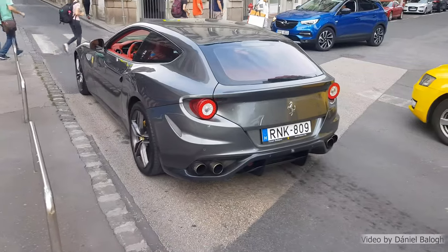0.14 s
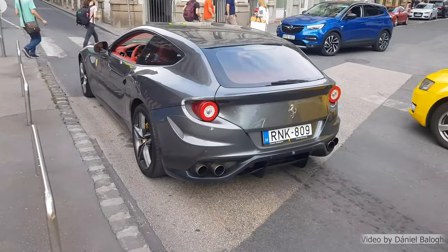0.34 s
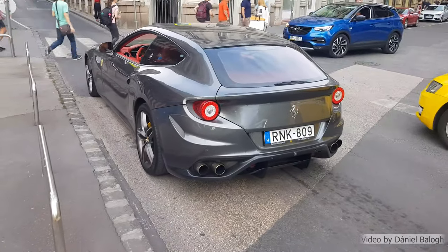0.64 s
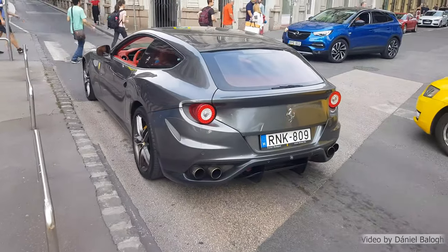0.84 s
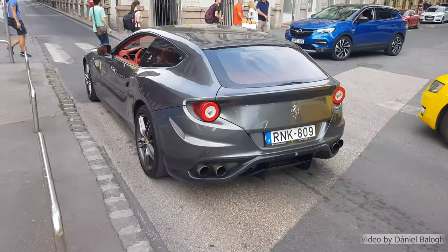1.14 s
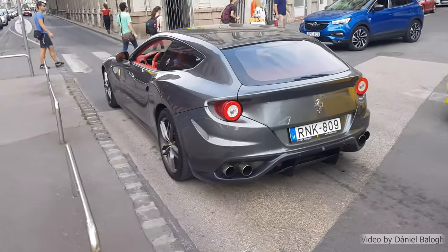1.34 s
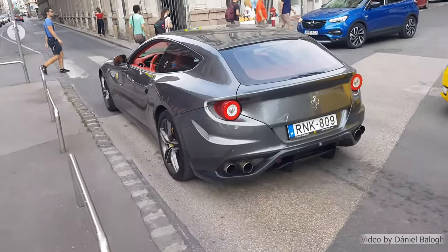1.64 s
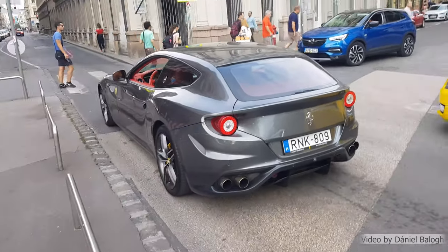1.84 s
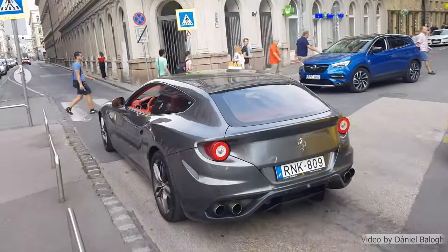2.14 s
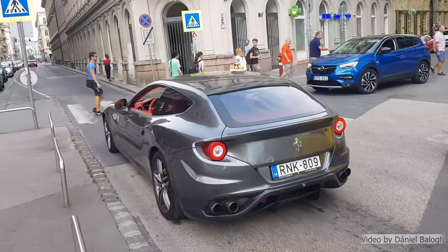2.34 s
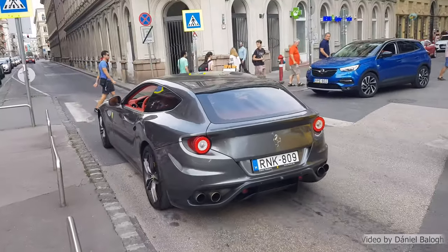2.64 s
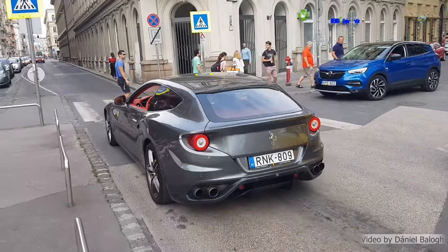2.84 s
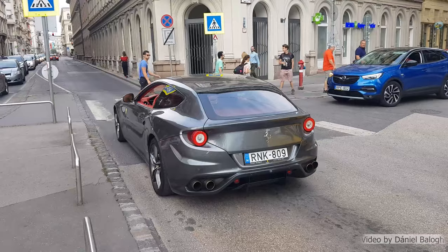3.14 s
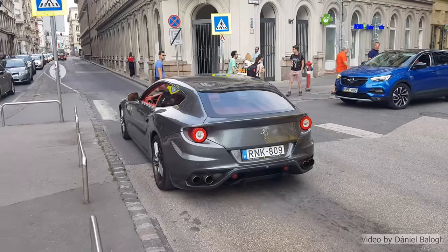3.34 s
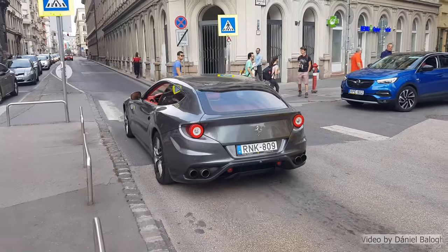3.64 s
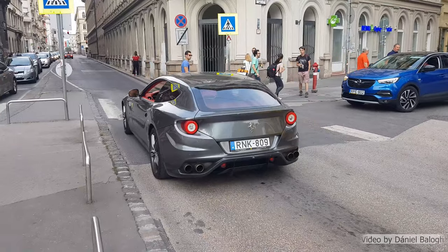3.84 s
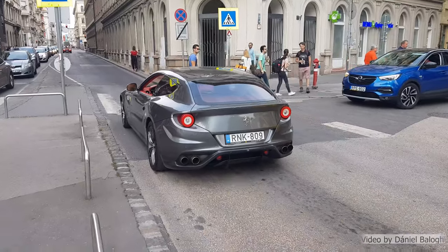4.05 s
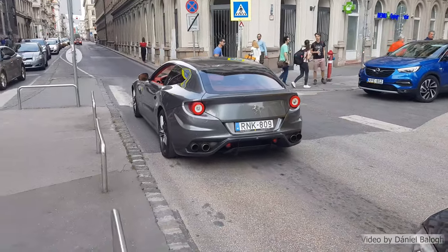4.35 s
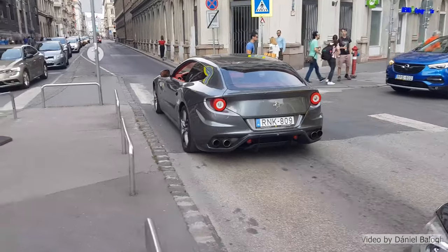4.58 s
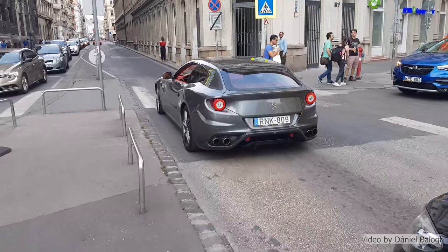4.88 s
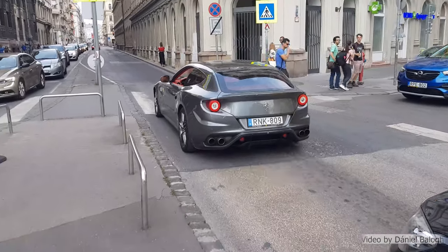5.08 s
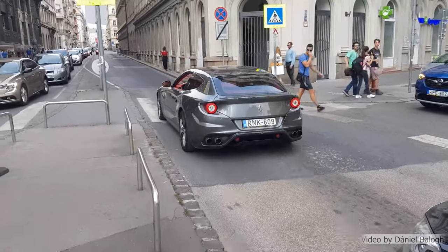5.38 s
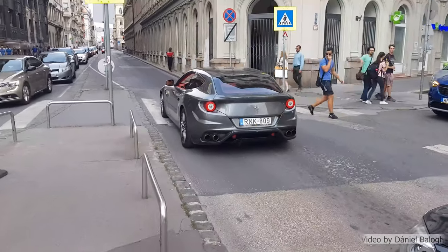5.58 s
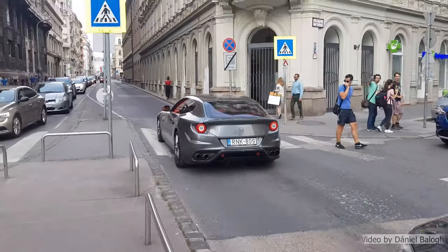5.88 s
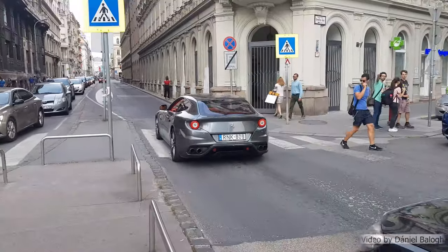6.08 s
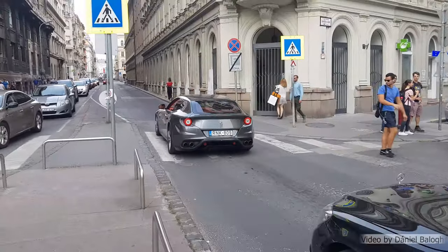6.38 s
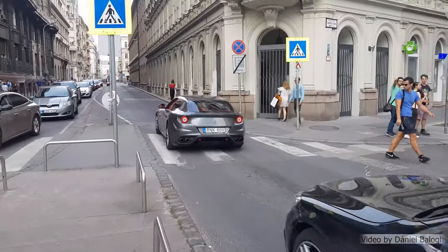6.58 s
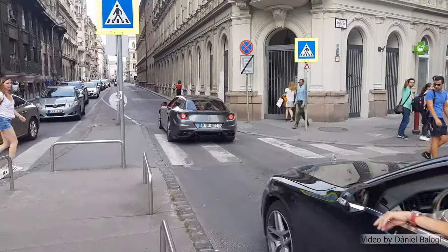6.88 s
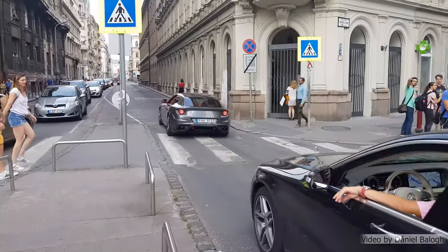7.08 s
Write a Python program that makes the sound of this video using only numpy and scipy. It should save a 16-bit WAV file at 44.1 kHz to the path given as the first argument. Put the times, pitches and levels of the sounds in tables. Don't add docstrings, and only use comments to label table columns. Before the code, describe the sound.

A handheld microphone stands behind a powerful car on a stone-fronted street. Its deep, muffled exhaust hums at idle, booms up, drops with a brief rasping crackle, then rises again as it leaves at modest revs, ending in a fainter, higher howl. Airy fan noise from another idling car swells at left early on, over steady distant traffic, with occasional handling knocks and dry clicks.

```python
import sys
import numpy as np
from scipy import signal
from scipy.fft import rfft, irfft
from scipy.io import wavfile
from scipy.ndimage import uniform_filter1d

SR = 44100
rng = np.random.default_rng(int(sys.argv[2]) if len(sys.argv) > 2 else 0)


def unload_wav(signal):
    wavfile.write(
        sys.argv[1],
        SR,
        np.round(np.clip(np.atleast_2d(signal).T, -1, 1) * 32767).astype(np.int16),
    )


def voltage_ratio(decibels):
    exponent = np.asarray(decibels, float) / 20
    return 10 ** exponent


N = 318402


def evened(x):
    return x / np.sqrt(np.mean(x ** 2) + 1e-20)


def levelled(x, lo_hz, hi_hz):
    sos = signal.butter(N=4, Wn=[lo_hz, hi_hz], btype="band", fs=SR, output="sos")
    return x / signal.sosfilt(sos, x).std()


def columns(rows):
    s, *values = np.transpose(rows)
    return [np.interp(np.arange(N) / SR, s, v) for v in values]


def read(points, hz):
    f, value = np.transpose(points)
    return np.interp(np.log(hz + 1), np.log(f + 1), value)


def bumps(rows):
    t = np.arange(N) / SR
    return sum(db * np.exp(-abs((t - s) / half) ** 3) for s, half, db in rows)


def wander(hz):
    b, a = signal.butter(N=2, Wn=2 * hz / SR)
    return evened(signal.lfilter(b, a, rng.standard_normal(N)))


def resonate(x, hz, width_hz):
    turn = np.exp(2j * np.pi * np.cumsum(hz * np.ones(N)) / SR)
    r = np.exp(-np.pi * width_hz / SR)
    smooth = signal.lfilter([(1 - r) ** 2], [1, -2 * r, r * r], x / turn)
    return 2 * (turn * smooth).real


def coloured(colour, same, patchy_db):
    frames, hz = N // 512 + 5, np.fft.rfftfreq(2048, 1 / SR)
    a, b, c, d, patches = rng.standard_normal((frames, 1025, 5)).T
    patches = uniform_filter1d(patches, size=24, axis=0)
    patches = evened(uniform_filter1d(patches, size=7, axis=1))
    like = np.clip(read(same, hz), -1, 1)[:, None]
    left, other = a + 1j * b, c + 1j * d
    z = np.array([left, like * left + np.sqrt(1 - like ** 2) * other])
    z *= voltage_ratio(read(colour, hz)[:, None] + patchy_db * patches)
    return signal.istft(z, nperseg=2048, noverlap=1536)[1][:, :N]


# (time [s], beat of one exhaust bank pair [Hz])
SPEED = [(.72, 35.54), (.84, 38.5), (1.45, 52.33), (2.24, 60.37), (2.38, 56.4), (2.65, 53.5), (2.75, 44.94),
         (2.88, 45.3), (3.0, 39.9), (3.22, 36.17), (3.8, 35.5), (4.1, 46.33), (4.36, 62.46), (4.62, 67.8),
         (5.04, 64.7), (5.46, 63.87), (6.3, 75.3), (7.22, 97.7)]
# (time [s], firing tone level [dB])
FIRING = [(0, -31), (.14, -22.5), (.7, -24.5), (1.12, -27.5), (1.4, -13), (1.7, -15.5), (2.9, -15),
          (3.0, -22), (3.8, -24.5), (4.15, -28), (4.62, -14), (5.04, -17), (5.46, -17.5), (5.88, -14),
          (6.25, -15.5), (6.58, -25.5), (6.9, -29), (7.22, -38)]


def engine():
    beat_hz, firing_db = columns(SPEED)[0], columns(FIRING)[0]
    swung = np.interp(np.arange(N) / SR, [2.9, 4.3], [0, 1])
    turns = np.cumsum(beat_hz * (1 + 0.0038 * wander(14.5))) / SR
    return beat_hz, turns, firing_db, swung


# (time [s], half length [s], level [dB])
STUMBLES = [
    (.31, .02, -4),
    (.76, 0.035, -11),
    (.9, 0.054, -7),
    (2.695, 0.024, -6),
    (2.96, 0.012, -11),
    (3.85, .03, -3),
    (4.09, 0.023, -3),
]
# (time [s], half length [s], level on multiple 3 [dB])
STRAIN = [
    (5.02, 0.45, 17.5),
]
# (frequency [Hz], full-throttle level [dB])
FIRST = [(36, -60), (44, -45), (55, -44), (65, -35), (72, -40), (90, -34), (96, -24)]
THIRD = [(108, -33), (135, -26.5), (152, -27.5), (168, -32), (182, -36), (196, -46), (240, -46.5),
         (290, -51)]
FOURTH = [(143, -24), (152, -29.5), (164, -38.5), (182, -41), (200, -44), (225, -52), (260, -54.5),
          (380, -54.5)]
FULL_DB = -16


def exhaust_hum(beat_hz, turns, firing_db, swung):
    open_db = 0.5 * (firing_db - FULL_DB)
    levels_db = [read(FIRST, beat_hz) + open_db,
                 firing_db + bumps(STUMBLES),
                 read(THIRD, 3 * beat_hz) + open_db + bumps(STRAIN) - 6 * swung,
                 read(FOURTH, 4 * beat_hz) + open_db]
    lumps_db = (3.5, 0.59, 1.4, 1.2)
    hum = 0
    for k, (db, lump_db) in enumerate(zip(levels_db, lumps_db), start=1):
        hum = hum + np.sqrt(2) * voltage_ratio(db + lump_db * wander(12.4)) * np.cos(2 * np.pi * k * turns)
    crank = sum(np.cos(2 * np.pi * (k / 3 * turns + rng.random())) * wander(4.2)
                for k in (2, 2.9, 7.3, 24, 10, 11))
    return hum + voltage_ratio(levels_db[1] - 32.5) * crank


def exhaust_puffs(turns):
    return (.3 + np.exp(-(2 * turns % 1) / .25)) * rng.standard_normal(N)


# (time [s], rasp level [dB])
RASP = [(0, -50.5), (.75, -45.5), (1, -60), (1.35, -49), (1.7, -42.5), (2.4, -38.5), (2.75, -45.5),
        (3.1, -47), (3.4, -61), (4.2, -56), (4.45, -46), (4.75, -42), (5.4, -45.5), (5.7, -45.5),
        (6.05, -48), (6.5, -46.5), (7.22, -42.5)]


def pipe_rasp(beat_hz, late, puffs, swung):
    pipe_hz, width_hz = 732 + (706 - 732) * swung, 90
    uneven = voltage_ratio(2.6 * wander(25))
    pulses = sum(np.roll(uneven, k * SR // 4) * np.cos(2 * np.pi * (k * late + rng.random()))
                 for k in range(5, 30))
    clear = np.clip(np.interp(beat_hz, (65, 73), [.2, .25]), 0, 1)
    gas = clear * evened(pulses) + (1 - clear) * evened(puffs)
    pipe = evened(resonate(gas, pipe_hz, width_hz))
    pipe += voltage_ratio(-2.5) * clear * evened(resonate(gas, pipe_hz / 2, width_hz / 2))
    pipe += voltage_ratio(-5) * swung * evened(resonate(puffs, 615, width_hz))
    return voltage_ratio(columns(RASP)[0] - 0.95) * pipe


# (ring [Hz], width [Hz])
TIPS = [(1085, 180), (1330, 300)]
# (time [s], half length [s], level [dB])
CRACKLES = [
    (2.548, .015, 9),
    (2.66, .04, 7),
]


def tip_hiss(puffs, firing_db, swung):
    shut = np.clip((FULL_DB - firing_db) / 10, 0, 1)
    warm = np.interp(np.arange(N) / SR, [2.3, 2.6, 3, 4.2], [1, 1.045, .98, 1.025])
    flow_db = columns(RASP)[0] + bumps(CRACKLES) - 4.5 * shut
    before_db, after_db = (1.5, -14), (2.7, 2.5)
    tips = 0
    for (hz, width_hz), near, far in zip(TIPS, before_db, after_db):
        db = flow_db + near + (far - near) * swung
        tips = tips + voltage_ratio(db) * evened(resonate(puffs, hz * warm, width_hz))
    return tips


# (time [s], half length [s], level over howl base [dB])
HOWLS = [
    (6.1, .19, 22),
    (6.24, .2, 29),
    (6.22, .12, 21),
    (6.43, .08, 26),
    (6.83, .24, 28),
    (7.11, .17, 27.5),
]
HOWL_ORDERS = 9, 10, 5, 9, 8, 7


def howl(late):
    return sum(voltage_ratio(-67 + bumps([row]) + 1.8 * wander(16)) * np.cos(2 * np.pi * k * late)
               for row, k in zip(HOWLS, HOWL_ORDERS))


def walls(x):
    t = np.arange(SR // 2) / SR
    taps = rng.choice([-1., 1.], (2, len(t))) * (rng.random((2, len(t))) < 2000 / SR)
    taps *= voltage_ratio(-60 * t / .5) * (t > .008)
    return signal.fftconvolve(x[None], taps / np.linalg.norm(taps[0]), axes=1)[:, :N]


def moving_car():
    beat_hz, turns, firing_db, swung = engine()
    hum = exhaust_hum(beat_hz, turns, firing_db, swung)
    late = turns + .012 * wander(14)
    puffs = exhaust_puffs(turns)
    pipe = pipe_rasp(beat_hz, late, puffs, swung) + howl(late)
    tips = tip_hiss(puffs, firing_db, swung)
    tips_heard = np.array([np.roll(tips, 7) * voltage_ratio(-3), tips])
    boom = hum + voltage_ratio(-27) * walls(hum)
    return boom + voltage_ratio(-3.0) * (pipe + tips_heard) + voltage_ratio(-10.5) * walls(pipe + tips)


# (frequency [Hz], density [dB per Hz])
STREET_COLOUR = [(15, -47), (25, -45), (64, -9), (87, -10.5), (153, -10), (195, -17), (256, -19),
                 (463, -25.5), (575, -23), (1040, -30), (2480, -36.5), (8590, -51), (10100, -55.5),
                 (14800, -54), (16000, -58)]
# (frequency [Hz], left-right likeness [-1..1])
STREET_LIKENESS = [(40, 0.5), (130, 0.98), (290, 0.86), (640, 0.25), (1400, 0), (3000, 0.12), (15000, 0)]
# (time [s], half length [s], level [dB])
PASSERS = [
    (2.3, 0.41, 3),
    (6, 0.64, 1),
    (-4.5, 1, -4),
]


def street():
    wash = levelled(coloured(STREET_COLOUR, STREET_LIKENESS, patchy_db=1.02), 195.0, 610)
    return wash * voltage_ratio(-40.5 + bumps(PASSERS) + .5 * wander(12.7))


# (time [s], level [dB])
FAN = [(0, -61), (.27, -54), (.32, -53), (1.2, -46), (2.35, -48.5), (3, -49.5), (3.9, -53), (4.74, -49.5),
       (5.25, -54.5), (5.85, -50), (6.4, -56.5), (6.9, -53.5), (7.22, -59)]
# (frequency [Hz], density [dB per Hz])
FAN_COLOUR = [(530, -35), (900, 0), (1080, -18), (1260, 0.5), (1470, -12), (2170, -10.5), (3150, -13.5),
              (4250, -17.5), (5610, -14), (8350, -22), (9310, -25), (11400, -23), (16000, -29.5)]


def fan_hiss():
    likeness = [(500, 1.0), (3000, 0.34), (8000, 0.11), (16000, .1)]
    hiss = levelled(coloured(FAN_COLOUR, likeness, patchy_db=1.5), 2380, 8900)
    return hiss * voltage_ratio(columns(FAN)[0] + 1.2 * wander(27))


# (frequency [Hz], density [dB per Hz])
ROAR_COLOUR = [(180, -27.5), (280, -2), (450, 1), (800, -2), (1400, -5), (2000, -16), (3200, -34)]
# (time [s], half length [s], level [dB])
ROAR_SWELLS = [
    (0, 0.13, -7),
    (.8, 0.52, 5),
    (1.17, 0.33, 10),
    (1.55, 0.18, 3.5),
    (2.3, .2, 9),
]


def roar():
    noise = evened(coloured(ROAR_COLOUR, [(300, 1.0), (3000, 1.0)], patchy_db=5.5))
    return voltage_ratio(-52 + bumps(ROAR_SWELLS)) * noise


# (ring [Hz], width [Hz], level [dB])
FAN_RINGS = [(2250, 460, -0.5), (4800, 1100, -2), (9820, 950, 0.5), (11500, 1500, -3.5)]
# (time [s], half length [s], level [dB], ring stretch [ratio])
WHIRR = [
    (2.83, 1.1, 18.5, 1.06),
    (2.2, 1.5, 20.5, 0.82),
    (1.8, 1.15, 15.5, 1),
    (2.29, 0.75, 19.5, 1.01),
    (4, 1.1, 3, 1.02),
    (1.1, .75, 17, 1.07),
    (0.74, .4, 5.5, 1.055),
    (5.65, .3, 8, 1.225),
]


def whirr():
    air = rng.standard_normal((2, N)) + 2.3 * rng.standard_normal(N)
    out = np.zeros((2, N))
    for (hz, width_hz, db), (*swell, stretch) in zip(FAN_RINGS + FAN_RINGS, WHIRR):
        drift = stretch * (1 + 0.012 * wander(4))
        level_db = db - 69.5 + bumps([swell]) + 1.4 * wander(14)
        out += voltage_ratio(level_db) * evened(resonate(air, hz * drift, width_hz))
    return out


# (time [s], idle tone [Hz], level [dB])
IDLE = [
    (.29, 52.7, -34),
    (.9, 54.2, -27),
    (1.6, 45.6, -38),
    (2.4, 51.7, -33),
    (2.9, 54.9, -35),
    (3.3, 55.1, -45),
    (4.1, 46, -43.5),
    (5.9, 45, -44.5),
    (6.4, 52.5, -40.5),
]


def idle_tone():
    hz, db = columns(IDLE)
    tone = np.cos(2 * np.pi * np.cumsum(hz * (1 + 0.0091 * wander(16.0))) / SR)
    started = np.arange(N) > IDLE[0][0] * SR
    return np.sqrt(2) * voltage_ratio(db + 1.7 * wander(23)) * tone * started


def waiting_car():
    air = fan_hiss() + roar() + whirr()
    air[1] = np.roll(air[1], 20)
    return idle_tone() + air * voltage_ratio([[1.1], [-1.1]])


# (time [s], right peak [dB], ring [Hz], left minus right [dB])
KNOCKS = [
    (.2952, -17, 200, -1),
    (.2953, -19, 45, 0),
    (1.8666, -2.5, 350.5, -18),
    (2.4803, -13.5, 1400, 1),
]
# (time [s], right peak [dB], ring [Hz], left minus right [dB])
GRIT = [(.6216, -25, 10440, -9), (3.0588, -24, 8000, -14), (3.0589, -37.5, 13000, -12),
        (3.0590, -24, 2730, -1), (3.0592, -25, 5002, -10), (3.7412, -26, 5435, -4),
        (6.4915, -21, 11500, -21.5), (6.4917, -32, 2782, -3), (6.61, -24.5, 13400, -11),
        (6.6102, -39, 2818, 7.5), (6.7785, -30, 4800, -5), (6.8557, -31, 4487, -8), (6.895, -44, 12600, -7),
        (7.053, -19, 12400, -21), (2.4535, -36, 7080, 5), (2.4808, -23.5, 1592, 1), (2.481, -33, 7000, 1),
        (2.4812, -40, 12820, 1.5), (2.4935, -31, 9500, -6), (1.8663, -21, 2585, -14),
        (1.8664, -20.5, 7500, -12)]


def ticks(rows, cycles):
    out, t = np.zeros((2, N)), np.arange(2000) / SR
    for s, db, hz, left_db in rows:
        ring = -np.sin(2 * np.pi * hz * t) * np.exp(-(t * hz / cycles) ** 2)
        part = out[:, round(s * SR):][:, :len(t)]
        part += voltage_ratio(db + np.array([[left_db], [0]])) * ring
    return out


# (time [s], level [dB], centre [Hz])
SCUFF = [
    (2.455, -70, 3236),
    (2.464, -36, 3380),
    (2.475, -45.5, 3530),
    (2.485, -35.5, 3600),
    (2.497, -44.5, 4800),
    (2.515, -46, 4800),
    (2.53, -68, 4500),
]


def scuff():
    db, hz = columns(SCUFF)
    grains = rng.standard_normal((2, N)) * voltage_ratio(1.6 * wander(412.5))
    n = np.arange(N)
    stroke = (n > SCUFF[0][0] * SR) & (n < SCUFF[-1][0] * SR)
    return voltage_ratio(db) * stroke * evened(resonate(grains, hz, 2120))


def scene():
    small = ticks(KNOCKS, cycles=0.3) + ticks(GRIT, cycles=1.7) + scuff()
    return moving_car() + street() + waiting_car() + small


def roll_off(x):
    return signal.sosfilt(signal.butter(12, 16540, fs=SR, output="sos"), x)


# (frequency [Hz], level [dB])
MICROPHONE = [(5000, 0), (5500, -3.5), (7600, -2), (8500, -4.5), (9300, -1.5), (15000, -0.5)]


def record(dry):
    hz = np.fft.rfftfreq(N, 1 / SR)
    colour = voltage_ratio(read(MICROPHONE, hz) + np.array([[.5], [-.5]])) * (hz < 15810)
    mix = irfft(rfft(dry) * colour, N)
    return roll_off(mix)


dry = scene()
out = record(dry)
unload_wav(out)
```